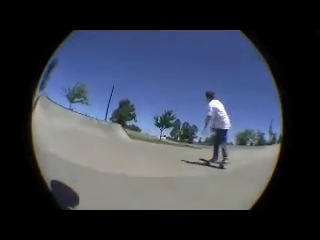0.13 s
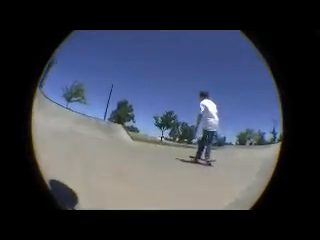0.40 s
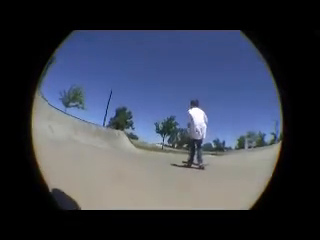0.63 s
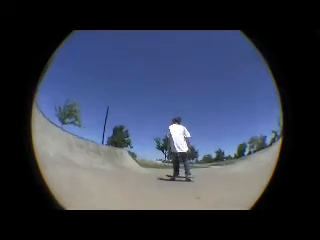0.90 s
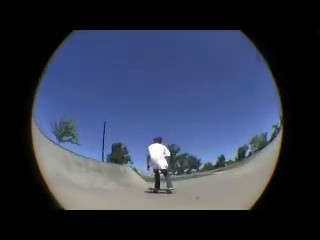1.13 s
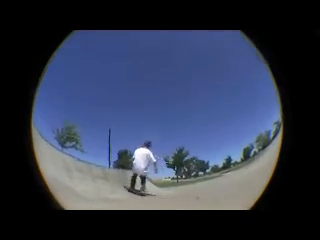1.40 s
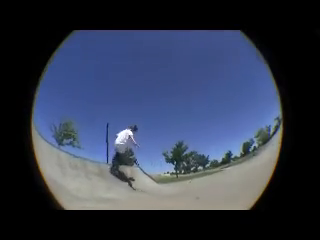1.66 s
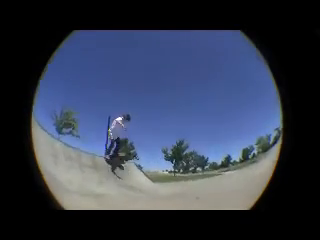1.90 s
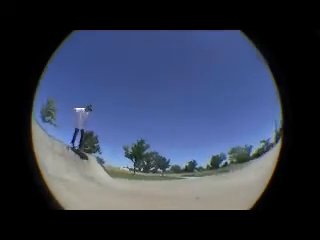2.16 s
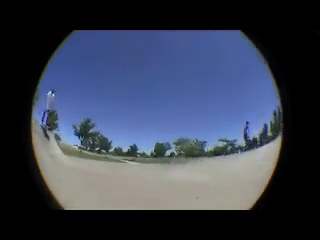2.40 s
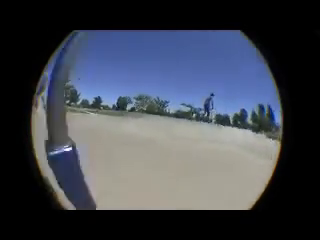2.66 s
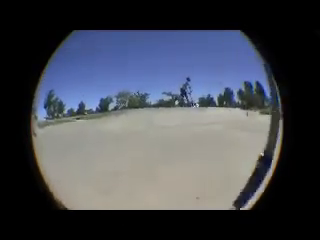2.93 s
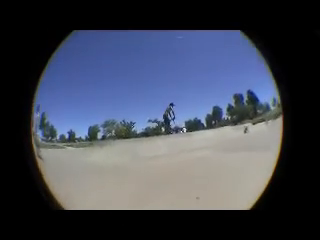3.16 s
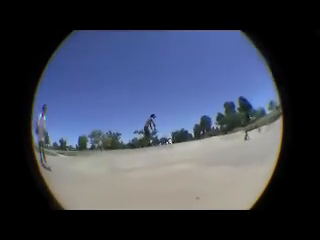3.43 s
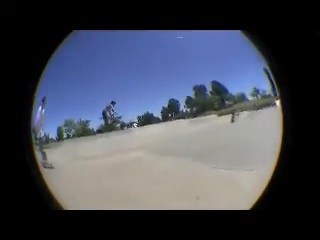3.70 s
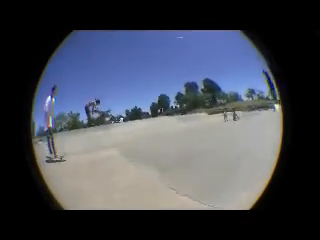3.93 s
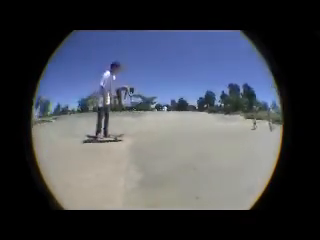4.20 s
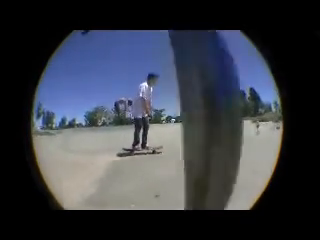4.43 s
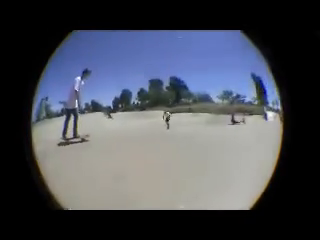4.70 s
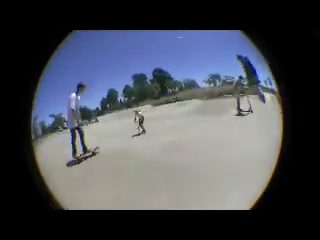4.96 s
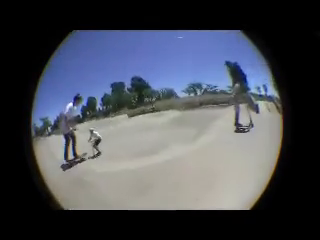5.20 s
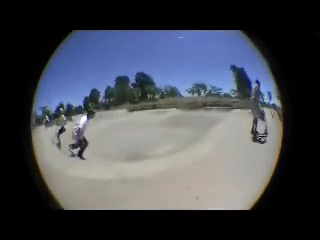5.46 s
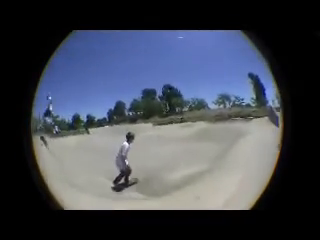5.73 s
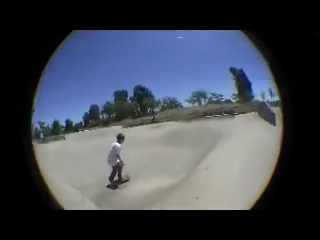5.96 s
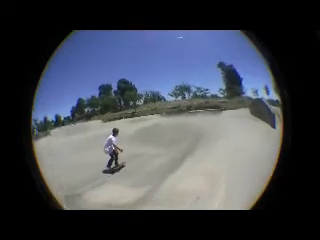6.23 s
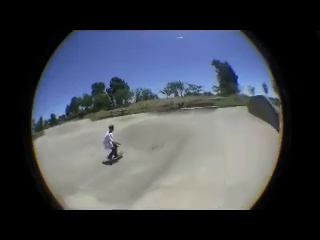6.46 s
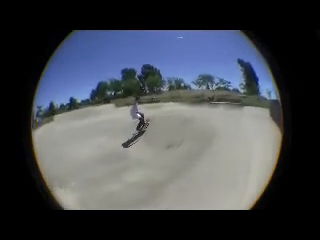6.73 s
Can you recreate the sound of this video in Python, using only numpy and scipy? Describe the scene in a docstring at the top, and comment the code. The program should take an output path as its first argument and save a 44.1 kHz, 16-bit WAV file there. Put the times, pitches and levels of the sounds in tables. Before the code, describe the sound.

Outdoors at a skatepark, wheels rasp over concrete with wooden seam knocks and early wind. The roll builds, ends in hard clacks, and gives way to a short lull with rubber squeaks and scuffs. Then a bang, duller rolling, dense ticking very close to the microphone, creaks, stronger deck rumble and renewed gusts, with very faint traffic behind.

```python
"""An open skatepark with rough concrete, boards rolling and a stereo pair of microphone ports riding close by.
Random grit impacts drum the deck, wheels and air; seams and landings ring filtered deck modes.
Shoes scuff as filtered noise and squeak as gliding tones; a loose fitting ticks and creaks close to the ports.
Gusts are shaped noise that pushes the two ports mostly in opposite phase; faint distant traffic lies behind."""
import sys
import numpy as np
from scipy import signal
from scipy.fft import rfft, irfft
from scipy.io import wavfile
from scipy.ndimage import uniform_filter1d

SR = 44100
rng = np.random.default_rng(int(sys.argv[2]) if len(sys.argv) > 2 else 0)


def unload_wav(signal):
    """Save mono or channel-first audio to the path in sys.argv[1] as 16-bit WAV at rate SR, clipped to [-1, 1]."""
    wavfile.write(
        sys.argv[1],
        SR,
        np.round(np.clip(np.atleast_2d(signal).T, -1, 1) * 32767).astype(np.int16),
    )


def how_loud(loudness_db):
    """Turn decibels into a plain amplitude multiplier (0 dB gives 1, 20 dB gives 10)."""
    steps = np.asarray(loudness_db, float) / 20
    return 10 ** steps


N = 302526
T = np.arange(N) / SR

# How loudly the boards roll, before small random swells.
# Each row: time in seconds, deck rumble in dB, wheel growl in dB, grit hiss in dB.
ROLL = [(0, -36, -29.5, -24), (.25, -35, -32.5, -25), (.55, -33, -23.5, -22), (.72, -36.5, -26.5, -25),
        (1.1, -33.5, -23.5, -19.5), (1.5, -28.5, -23, -21.5), (1.72, -23, -24.5, -22),
        (1.87, -28, -30.5, -38), (1.945, -40, -42, -47), (1.965, -36, -22, -34), (2.01, -41, -32, -39.5),
        (2.1, -42.5, -40.5, -41), (2.22, -39, -36, -37.5), (2.42, -42.5, -40.5, -43.5),
        (2.5, -40, -39.5, -39.5), (2.59, -56, -47, -47.5), (2.7, -40, -34.5, -38), (2.92, -36, -40.5, -39),
        (3.02, -22, -28.5, -26.5), (3.15, -26, -31.5, -28), (3.3, -27, -33.5, -33), (3.55, -30, -34.5, -34),
        (3.8, -28, -31.5, -30), (4.1, -34.5, -36.5, -35), (4.22, -31.5, -32, -35),
        (4.36, -28.5, -26.5, -31.5), (4.42, -26, -34.5, -31), (4.7, -38.5, -31.5, -31),
        (4.85, -26.5, -31.5, -30.5), (4.92, -31, -34, -34), (4.99, -28.5, -32.5, -35.5),
        (5.06, -32.5, -34, -36), (5.18, -24.5, -29.5, -31), (5.3, -30.5, -27.5, -30.5),
        (5.55, -28.5, -27.5, -34), (5.65, -27, -24, -28.5), (5.72, -19, -28.5, -29.5),
        (5.8, -21.5, -25, -31.5), (5.88, -21, -19.5, -24.5), (6.0, -23.5, -27, -30), (6.12, -26, -28, -29),
        (6.35, -24, -25, -26), (6.45, -27, -27.5, -34), (6.55, -29.5, -24, -28), (6.7, -26, -29, -32.5),
        (6.78, -27.5, -31, -34), (6.86, -31, -27, -32.5)]


def level(x):
    """Scale to rms 1."""
    return x / np.sqrt(np.mean(x ** 2))


def colour(x, points):
    """Shape a long sound by (Hz, dB) points, straight lines over log frequency, then scale to rms 1."""
    hz, db = np.transpose(points)
    f = np.maximum(np.fft.rfftfreq(len(x), 1 / SR), 1)
    gain = how_loud(np.interp(np.log(f), np.log(hz), db))
    return level(irfft(rfft(x) * gain, len(x)))


def ring(x, hz, t60):
    """One decaying mode, near peak 1 for a unit blow, deaf to slow pushes."""
    radius = np.exp(-np.log(1000) / (t60 * SR))
    angle = 2 * np.pi * hz / SR
    return signal.lfilter([.5, 0, -.5], [1, -2 * radius * np.cos(angle), radius * radius], x)


def band(x, hz, width_hz):
    """Resonant band-pass."""
    return signal.lfilter(*signal.iirpeak(hz, hz / width_hz, SR), x)


def walk(rate):
    """Random levels of rms 1, held 1 / rate seconds and smoothed twice."""
    k = int(SR / rate)
    held = np.repeat(rng.standard_normal(N // k + 1), k)
    return level(uniform_filter1d(uniform_filter1d(held, k), k)[:N])


def add(out, s, x):
    """Mix x in at time s."""
    i = int(s * SR)
    out[i:i + len(x)] += x[:N - i]


def traffic():
    """Distant traffic is low-pitched noise whose level wanders slowly."""
    # Spectrum of the far bed. Each row: frequency in Hz, level in dB.
    far_shape = [(30, -11.5), (100, -0.5), (250, -5.5), (600, -42), (2000, -50)]
    wander_db = 2.2 * walk(4.23)
    return how_loud(-48.5 + wander_db) * colour(rng.standard_normal(N), far_shape)


def wind():
    """Turbulence pushes the ports mostly against each other, harder on the right; weak air only rumbles."""
    # Gust strength before flutter. Each row: time in seconds, level in dB.
    gusts = [(0, -17), (.22, -23.5), (.62, -23), (.84, -25), (.96, -25.5), (1.05, -25.5), (1.2, -67),
             (1.42, -53), (1.58, -77), (2.16, -80), (2.28, -53), (2.64, -28), (2.88, -59), (3.0, -45),
             (3.8, -46), (4.0, -69), (4.2, -34), (4.36, -48), (4.68, -51), (4.85, -33), (5.0, -16),
             (5.17, -22), (5.36, -30), (5.76, -16), (5.88, -25.5), (6.14, -24.5), (6.36, -19.5),
             (6.48, -20.5), (6.68, -24), (6.86, -17.5)]
    # Spectrum of the turbulence. Each row: frequency in Hz, level in dB.
    wind_shape = [(30, -23), (103, 1.5), (194, 3.5), (735, -5.5), (1100, -14), (1500, -25.5), (4000, -79)]
    # Further shaping of the part common to both ports. Each row: frequency in Hz, level in dB.
    shared_shape = [(30, -31), (130, -15.5), (300, -11), (700, -6.5), (2000, -1)]
    flutter_db = 3.5 * np.clip(walk(25), -2.5, 1.2)
    gust_db = np.interp(T, *np.transpose(gusts)) + flutter_db
    against = colour(rng.standard_normal(N), wind_shape)
    shared = how_loud(-9.0) * colour(colour(rng.standard_normal(N), wind_shape), shared_shape)
    air = shared + against * np.array([[.85], [-1.15]])
    low = signal.sosfilt(signal.butter(2, 220, fs=SR, output="sos"), air)
    upper_db = np.minimum(0.96 * (gust_db + 23.5), 0)  # gusts under -23.5 dB lose their upper part
    return how_loud(gust_db) * (low + (air - low) * how_loud(upper_db))


def fitting_slips():
    """List the fitting's (time, dB): single slips, then fast runs of uneven slips that creak."""
    # Single slips. Each row: time in seconds, peak of the first click in dB.
    ticks = [(1.516, -13), (1.536, -11.5), (1.566, -14), (1.604, -16), (1.625, -10.5), (1.644, -16),
             (1.682, -22), (1.716, -17), (1.76, -11.5), (1.8022, -13.5), (1.8806, -18), (1.9543, 0.5),
             (2.1741, -29), (3.7772, -10), (3.7899, -10.5), (3.8055, -11.5), (3.8299, -9), (3.8467, -14),
             (3.8633, -15), (3.8807, -12.5), (3.9059, -11.5), (3.9245, -12), (3.9425, -20), (3.9609, -17),
             (3.9778, -23), (3.9939, -14), (4.2471, -16.5), (4.2527, -16.5), (4.3986, -2.5), (4.43, -11),
             (4.4447, -14), (4.4695, -8), (4.4835, -8), (4.5037, -7), (4.5139, -4), (4.5261, -9),
             (4.5422, -8), (4.554, -4), (4.5666, -6), (4.5751, -5.5), (4.5817, -11), (4.5979, -7),
             (4.622, -9), (4.632, -7), (4.6458, -8), (4.656, -12), (4.663, -12), (4.6739, -9), (4.685, -9),
             (4.6931, -8), (4.7027, -5), (4.712, -8), (4.7223, -9.5), (4.7295, -10.5), (4.7435, -10),
             (4.7535, -10), (4.7637, -7.5), (4.7726, -7.5), (4.7825, -11.5), (4.79, -12.5), (4.8001, -10),
             (4.81, -13), (4.819, -5.5), (4.831, -7.5), (4.839, -12), (4.852, -11), (4.8735, -11),
             (5.23, -21), (5.239, -17), (5.2475, -13), (5.26, -16), (5.267, -21), (5.274, -19),
             (5.282, -20), (5.289, -12.5), (5.298, -15), (5.306, -17), (5.313, -17), (5.32, -15),
             (5.327, -18), (5.3355, -17), (5.346, -15), (5.353, -10.5), (5.361, -14), (5.371, -21),
             (5.3819, -11), (5.3939, -14), (5.416, -18), (5.428, -21), (5.4393, -24), (5.4587, -18),
             (5.473, -22), (5.485, -27), (5.4967, -16), (5.513, -23), (5.598, -16), (5.62, -11.5),
             (5.627, -16), (5.636, -23), (5.645, -10), (5.66, -14), (5.678, -11), (5.7267, -19.5),
             (5.7461, -28), (6.0323, -17), (6.0518, -18), (6.2305, -20), (6.2499, -18), (6.2785, -13),
             (6.287, -15), (6.298, -14), (6.311, -13), (6.32, -15), (6.33, -13.5), (6.341, -15),
             (6.353, -16), (6.3615, -15), (6.3735, -14.5), (6.3927, -22), (6.4032, -18), (6.4142, -17),
             (6.422, -24), (6.43, -20), (6.44, -21), (6.4501, -18), (6.4591, -21), (6.4696, -17),
             (6.4815, -18), (6.492, -21), (6.501, -20), (6.5503, -9.5), (6.6649, -12), (6.6825, -13.5)]
    # Creaks. Each row: start in seconds, end in seconds, slips a second at the start, the same at the end,
    # click peak in dB before the build-up and scatter.
    creaks = [(5.125, 5.182, 167, 215, -19), (5.175, 5.221, 200, 140, -14), (5.823, 6.024, 227, 98, -19),
              (6.5, 6.631, 128, 77, -17.5)]
    gap_jitter, spread_db = .07, 1.2
    start_db, rise_s = -2, 0.13  # a creak starts softer and builds up
    slips = list(ticks)
    for start, end, rate, end_rate, db in creaks:
        s = start
        for a, b in rng.standard_normal((40, 2)):
            s += np.exp(gap_jitter * a) / np.interp(s, [start, end], [rate, end_rate])
            if s < end:
                build_db = start_db * np.exp((start - s) / rise_s)
                slips.append((s, db + spread_db * b + build_db))
    return slips


def fitting():
    """Every slip snaps a plastic body for a cycle or two; the metal near the bearing spot rings just after."""
    # Where the fitting bears, from each time on. Each row: time in seconds, body pitch in Hz before scatter,
    # body t60 in seconds (at least 2 ms is used), metal pitch in Hz, metal peak in dB over the click.
    bearing = [(0, 2280, .005, 6400, 0), (1.7, 2400, 0.004, 8500, 3.5), (1.79, 2260, 0.0056, 7040, 5.5),
               (1.85, 5050, .004, 5070, -8), (1.9, 4370, 0.0077, 5500, -10), (3.7, 2900, .0038, 7500, 3),
               (3.87, 2550, 0.0018, 7700, 6.5), (4.2, 4700, 0.0055, 7000, 5),
               (4.3, 2440, 0.0053, 7700, -2.5), (4.605, 2570, 0.0041, 7600, -8),
               (4.74, 2740, 0.0039, 6800, -3), (4.785, 2820, 0.0034, 6830, -1.5),
               (5.1, 3610, 0.006, 7300, -1.5), (5.29, 3500, 0.0046, 7060, -4),
               (5.385, 2440, 0.0042, 6550, 6), (5.55, 2760, 0.013, 6040, -9),
               (5.7, 2740, 0.0053, 9200, 6.5), (5.8, 3430, 0.0097, 6900, 5.5),
               (6.2, 3500, 0.0087, 7250, 4.5), (6.4, 3480, 0.0086, 6800, 4), (6.53, 2560, 0.0049, 6330, 1),
               (6.64, 2250, 0.0037, 6600, -4)]
    # Metal modes. Each row: pitch in Hz before scatter, dB before the bearing spot and scatter, t60 in seconds.
    metal_modes = [(5070, 15, 0.017), (6120, 18, 0.015), (6800, 8.5, 0.022), (7440, 11.5, 0.024),
                   (7840, 18.5, 0.0098), (8180, 11, 0.027), (8500, 11, 0.019), (9250, 11, 0.02),
                   (10550, 11, 0.018)]
    slope_db = 30  # loss per octave away from the bearing spot
    metal_lag_s = .0004
    rebound_s, rebound_db = .0021, -14.5  # the part bounces once
    slips = fitting_slips()
    out, t = np.zeros(N), T[:int(.03 * SR)]
    snap = np.sin(np.pi * np.minimum(t / .00016, 1)) ** 2
    for s, db in slips:
        _, hz, body_t60, metal_hz, metal_db = [row for row in bearing if row[0] <= s][-1]
        hz *= 1 + .03 * rng.standard_normal()
        click = -ring(snap, hz, max(body_t60, .002))
        # weaker modes beside, below and above the main one
        body = click - .35 * ring(snap, 1.06 * hz, .016) - .3 * ring(snap, .86 * hz, .015)
        body += 0.3 * ring(snap, 0.465 * hz, 0.0082) + 0.21 * ring(snap, 1.6 * hz, 0.019)
        play = rng.standard_normal((len(metal_modes), 3))  # a loose part never seats the same way
        metal = np.zeros(len(t))
        for (f, g, t60), (a, b, c) in zip(metal_modes, play):
            mode_db = g + 2 * a - slope_db * abs(np.log2(f / metal_hz))
            tone = np.sin(2 * np.pi * f * (1 + 0.0053 * b) * t + 0.69 * c)
            metal += how_loud(mode_db) * tone * np.exp(-np.log(1000) * t / t60)
        metal *= 1 - np.exp(-(t / 0.00013) ** 2)  # soft onset
        click_peak = abs(click).max()
        add(out, s, how_loud(db) * body / click_peak)
        add(out, s + rebound_s * (1 + .1 * play[0, 1]), how_loud(db + rebound_db) * click / click_peak)
        add(out, s + metal_lag_s, how_loud(db + metal_db) * metal / abs(metal).max())
    return out


def shoes():
    """Soles hiss as they drag, and rubber squeaks on grip tape in short gliding tones."""
    # Soles on the ground. Each row: start in seconds, length in seconds, rms in dB before the fades,
    # centre in Hz, width in Hz.
    scuffs = [(2.113, 0.042, -36, 7000, 5000), (2.185, 0.11, -35, 6000, 2000),
              (2.62, 0.082, -23.5, 6300, 4670), (2.826, 0.04, -25, 4800, 7860),
              (1.953, 0.0082, -20, 4400, 2500), (3.242, 0.03, -29.5, 5860, 4960),
              (3.424, 0.043, -30, 5760, 5000), (6.069, 0.026, -24, 5340, 3000),
              (6.535, 0.055, -25.5, 6030, 4080)]
    # Squeaks. Each row: start in seconds, length in seconds, pitch in Hz, end pitch in Hz,
    # level of the first partial in dB, number of partials.
    squeaks = [(2.122, 0.015, 1830, 2050, -25.5, 1), (2.173, 0.036, 4330, 3800, -36, 1),
               (2.205, 0.067, 1318, 1436, -29.5, 5), (2.244, 0.0445, 1770, 1500, -26.5, 1),
               (2.266, 0.052, 2040, 1730, -29, 1)]
    out = np.zeros(N)
    for s, length, db, hz, width_hz in scuffs:
        drag = level(band(rng.standard_normal(int(length * SR)), hz, width_hz))
        add(out, s, how_loud(db) * drag * signal.windows.tukey(len(drag), .6))
    for s, length, hz, end_hz, db, count in squeaks:
        phase = 2 * np.pi * np.cumsum(np.linspace(hz, end_hz, int(length * SR))) / SR
        # partials 1, 4, 7.. are full, the others weaker
        stack = sum(np.sin(k * phase) * (1 if k % 3 == 1 else .4) for k in range(1, round(count) + 1))
        add(out, s, how_loud(db) * stack * np.hanning(len(phase)))
    return out


def random_seams():
    """Small seams knock at random, louder where the deck rumbles louder."""
    per_s, over_rumble_db, loudest_hz = 3, 7.5, 613  # middle values; gap, level and pitch scatter
    luck = rng.standard_normal((40, 3))
    times = np.cumsum(np.exp(.5 * luck[:, 0])) / per_s
    rumble_db = np.interp(times, *np.transpose(ROLL)[:2])
    seams = []
    for s, db, (_, a, b) in zip(times, rumble_db, luck):
        if s < T[-1]:
            seams.append((s, db + over_rumble_db + 2 * a, loudest_hz * np.exp(0.27 * b), -12))
    return seams


def knocks():
    """A rough push of some milliseconds rings the deck modes near the struck spot; a crack rides on top."""
    # Wheels over seams, landings, tail on the ground. Each row: time in seconds, peak of the deck ring in dB,
    # loudest pitch in Hz, crack trim in dB (its peak lies 7 dB above this, relative to the deck ring).
    blows = [(0.155, -12.5, 650, -12), (0.253, -10.5, 795, -10), (0.319, -10, 750, -8),
             (0.4465, -3.5, 1300, -16), (0.483, -11.5, 623, -6), (0.665, -8.5, 854, -19),
             (1.015, -11, 900, -6), (1.098, -14, 880, -4), (1.353, -6, 2700, -14), (1.3588, -6, 910, -11),
             (1.395, -10, 834, -11), (1.479, -5.5, 507, -10), (1.8955, -6, 810, -19),
             (1.9, -2.5, 1440, -27), (1.956, -5, 1030, -27), (1.957, -10, 1990, -21),
             (1.982, -4.5, 1810, -16), (2.171, -17.5, 650, -8), (2.373, -23, 1580, -21),
             (2.627, -14, 1030, -14), (2.704, -15.5, 650, -18), (2.847, -9.5, 456, -9),
             (2.857, -2.5, 795, -5.5), (2.863, -7.5, 1290, -18), (2.871, -15, 1310, -6),
             (3.095, -11, 1000, -20), (3.16, -4.5, 920, -13.5), (3.252, -11.5, 590, -4.5),
             (3.46, -8, 1040, -16), (3.736, -12.5, 606, -10), (3.888, -7, 1480, -22),
             (4.165, -12.5, 980, -18), (4.33, -10, 1790, -25), (4.444, -9.5, 2250, -20),
             (4.546, -5, 2130, -17), (4.604, -5, 2250, -11), (4.609, -7, 1600, -11),
             (4.635, -9.5, 1130, -8), (4.977, -15, 450, -18), (5.186, -13, 1400, -13),
             (5.191, -12, 1500, -12), (5.288, -8.5, 1516, -22), (5.395, -6, 1130, -14),
             (5.399, -5.5, 1000, -9), (5.445, -10, 1183, -27), (5.848, -6, 1500, -17),
             (5.863, -12, 1200, -12), (5.869, -12, 1200, -14), (5.878, -11, 1800, -16),
             (5.911, -16, 1500, -8), (5.933, -11, 1000, -8), (5.944, -9, 1400, -12),
             (6.225, -9, 1110, -10.5), (6.635, -6.5, 590, -11), (6.6817, -6.5, 1720, -18),
             (6.697, -7.5, 710, -22)]
    # Deck modes. Each row: pitch in Hz before scatter, dB before the struck spot's slope, t60 in seconds.
    deck_modes = [(300, -5.5, 0.11), (399, 8.5, 0.021), (606, -3.5, 0.039), (696, 3.5, 0.013),
                  (876, -10, 0.092), (960, 1, 0.016), (1164, -10.5, 0.086), (1457, 1, 0.018),
                  (1730, -7.5, 0.032), (2170, -4.5, 0.031), (2900, -11, 0.011)]
    slope_db = 13  # loss per octave away from the struck spot
    middle_contact_s = .0034  # rattle decay of a -13 dB blow
    first_touch = 5  # strength of the first touch against the rattle
    out, t = np.zeros(N), T[:int(.1 * SR)]
    for s, db, hz, crack_db in blows + random_seams():
        contact_s = middle_contact_s * how_loud(.2 * (db + 13))  # harder blows rattle longer
        blow = (1 - np.exp(-t / 0.00082)) * np.exp(-t / contact_s)
        push = rng.standard_normal(len(t)) * blow
        detune = 1 + 0.061 * rng.standard_normal(len(deck_modes))
        push[SR // 2000] += first_touch
        # urethane and wood give way
        push = signal.sosfilt(signal.butter(2, 2.96 * hz, fs=SR, output="sos"), push)
        body = np.zeros(len(t))
        for (f, g, t60), k in zip(deck_modes, detune):
            mode_db = g - slope_db * abs(np.log2(f / hz))
            body += how_loud(mode_db) * ring(push, f * k, t60)
        crack = band(rng.standard_normal(len(t)), 5000, 2300) * blow
        crack = how_loud(crack_db + 7.0) * crack / abs(crack).max()
        add(out, s, how_loud(db) * (body / abs(body).max() + crack))
    return out


def grit(rate, spread_db, flicker_db):
    """Stones of the concrete strike the wheel at random, a few of them hard; patches are rougher than others."""
    hits = (rng.random(N) < rate / SR) * rng.standard_normal(N)
    return hits * how_loud(spread_db * rng.exponential(size=N) + flicker_db * walk(45))


def wheels():
    """Grit drums the deck, the wheels and the air; speed and surface set each level."""
    # Spectra of the three layers. Each row: frequency in Hz, level in dB.
    rumble_shape = [(40, -51), (110, -24), (250, -4.5), (460, 3), (640, -7), (900, 0), (1500, 0.5),
                    (3000, -33.5)]
    growl_shape = [(600, -17.5), (1100, -3.5), (1900, 4.5), (2800, 0.5), (4200, -4.5), (6000, -42)]
    hiss_shape = [(3000, -8.5), (4600, 3.5), (6000, 3.5), (8000, -1), (10000, -5), (11600, -11.5),
                  (12200, -78), (13000, -75)]
    # Power share of the hiss that rings the wheel. Each row: time in seconds, share from 0 to 1.
    sing_share = [(0, 0.55), (.5, 0.03), (.9, 0.01), (1.2, 0.2), (1.65, 0.3), (1.9, 0.01), (3.7, 0),
                  (4.2, 0), (5.0, 0), (6.86, 0)]
    # Power share of the rumble that drones in the deck. Each row: time in seconds, share from 0 to 1.
    drone_share = [(0, 0.6), (1.5, 0.5), (1.72, 0.19), (1.9, 0), (2.9, 0.27), (3.8, 0.26), (4.2, 0.14),
                   (5.5, 0.05), (5.75, 0.08), (6.86, 0.11)]
    s, *columns = np.transpose(ROLL)
    rumble_db, growl_db, hiss_db = (np.interp(T, s, c) for c in columns)
    singing = np.clip(np.interp(T, *np.transpose(sing_share)), 0, 1)
    droning = np.clip(np.interp(T, *np.transpose(drone_share)), 0, 1)
    bumps = how_loud(.7 * walk(25))
    surge = how_loud(.8 * walk(9))  # slow swells of the roll over rougher slabs

    coarse = grit(2600, spread_db=1.24, flicker_db=0.8)
    drone = level(band(band(coarse, 640, 397), 640, 397))
    rumble = np.sqrt(1 - droning) * colour(coarse, rumble_shape) + np.sqrt(droning) * drone
    growl = colour(grit(5000, spread_db=1.0, flicker_db=1.7), growl_shape)

    fine = grit(20000, spread_db=1.5, flicker_db=.8)
    wheel_ring = colour(band(fine, 6600, 750), hiss_shape)
    hiss = np.sqrt(1 - singing) * colour(fine, hiss_shape) + np.sqrt(singing) * wheel_ring
    # a wheel bearing sings at speed, 14 dB under the hiss, with short fades
    song_on = uniform_filter1d(1. * (T > .95) * (T < 1.82), SR // 10)
    hiss += how_loud(-14) * level(band(fine, 8450, 50)) * song_on
    low_layers = how_loud(rumble_db) * rumble + how_loud(growl_db) * growl
    return bumps * (surge * low_layers + how_loud(hiss_db) * hiss)


def scene():
    """The boards move a little left and right, which the close ports hear mostly below the treble."""
    # Where the boards are. Each row: time in seconds, nominal left minus right in dB, between 350 and 3900 Hz.
    pan = [(0, 0), (1.7, 0), (2.6, 3.5), (2.83, 6.5), (3.3, 5.5), (3.75, 3), (3.9, 3.5), (4.6, 2), (5.3, 4),
           (5.65, 10), (5.85, 0), (6.86, 1)]
    boards = wheels() + knocks() + shoes()
    lean = np.tanh(np.interp(T, *np.transpose(pan)) * np.log(10) / 40)
    middle_band = signal.butter(8, [350, 3900], "band", fs=SR, output="sos")
    side = lean * signal.sosfilt(middle_band, boards)
    near = boards + fitting()
    return near + side * np.array([[1], [-1]]) + traffic() + wind()


def band_limit(x):
    """A steep low-pass at the top of the band."""
    return signal.sosfilt(signal.butter(12, 12690, fs=SR, output="sos"), x)


def record(dry):
    """The microphone input thins the bass, rounds the loudest peaks and cuts the top."""
    ceiling, gain_db = .72, -1.5
    thin = signal.sosfilt(signal.butter(2, 45, "high", fs=SR, output="sos"), dry)
    rounded = ceiling * np.tanh(how_loud(gain_db) * thin / ceiling)
    cut = signal.sosfilt(signal.ellip(8, .3, 60, 11700, fs=SR, output="sos"), rounded)
    return band_limit(cut)


dry = scene()
out = record(dry)
unload_wav(out)
```